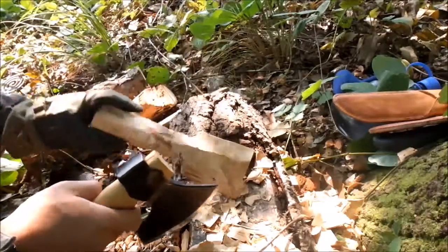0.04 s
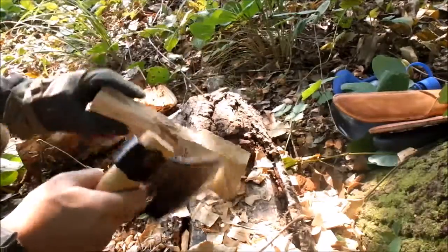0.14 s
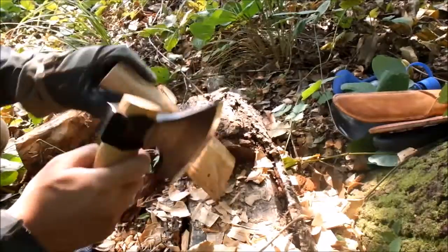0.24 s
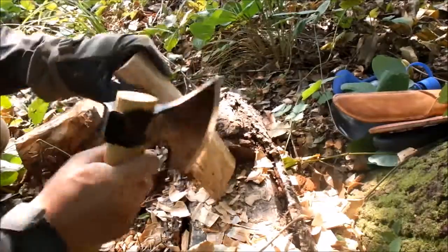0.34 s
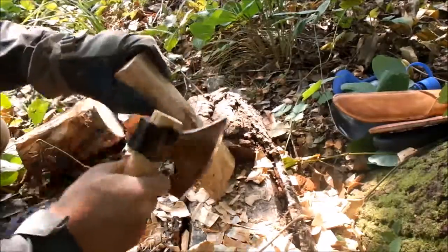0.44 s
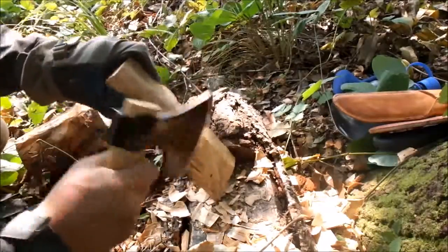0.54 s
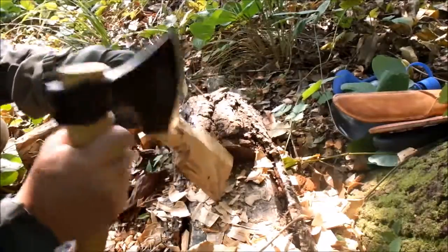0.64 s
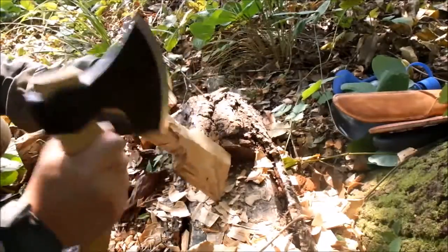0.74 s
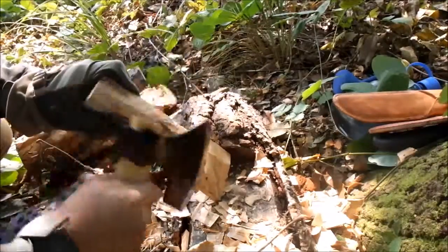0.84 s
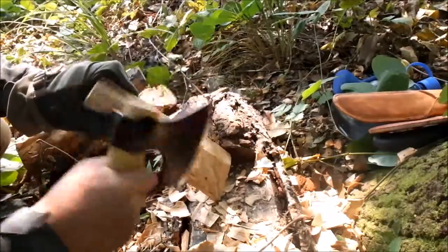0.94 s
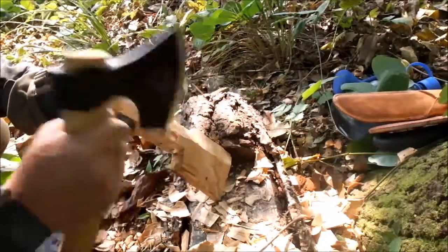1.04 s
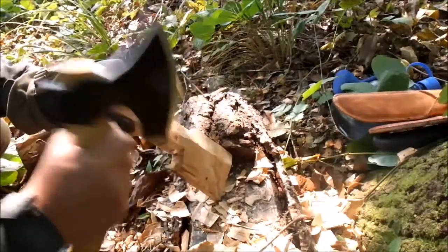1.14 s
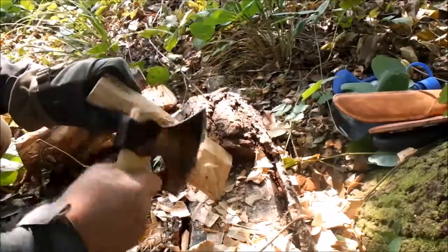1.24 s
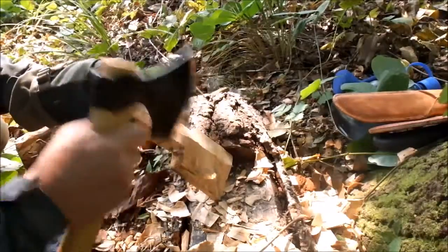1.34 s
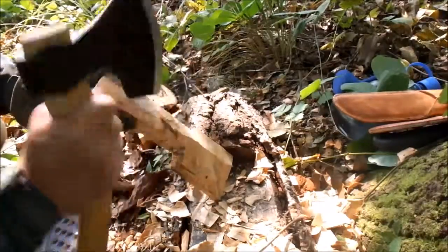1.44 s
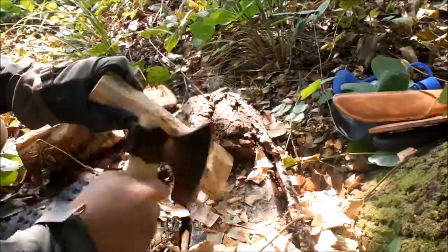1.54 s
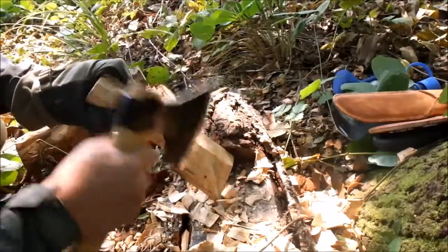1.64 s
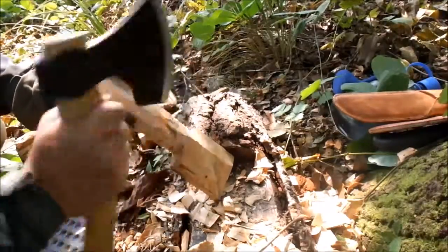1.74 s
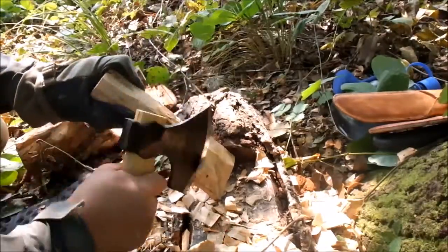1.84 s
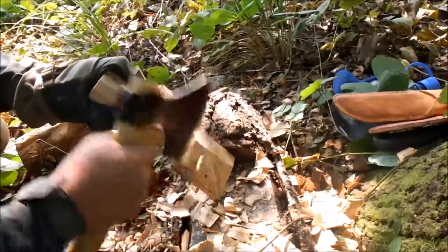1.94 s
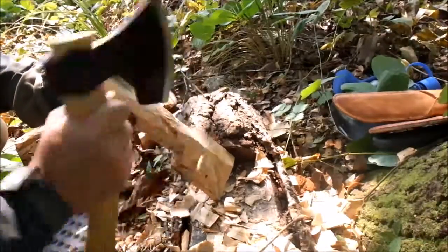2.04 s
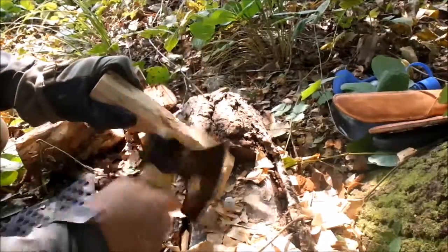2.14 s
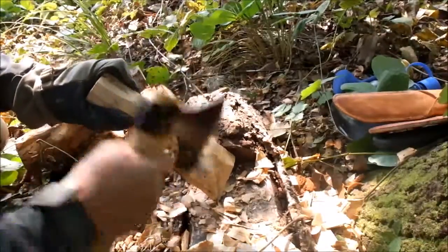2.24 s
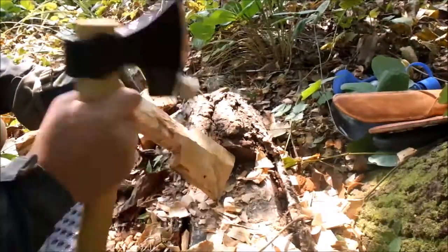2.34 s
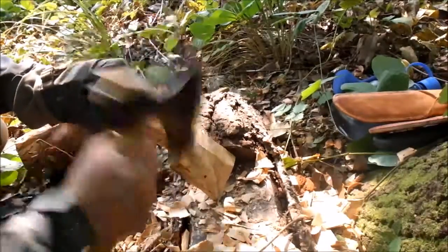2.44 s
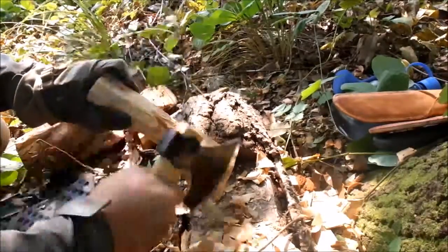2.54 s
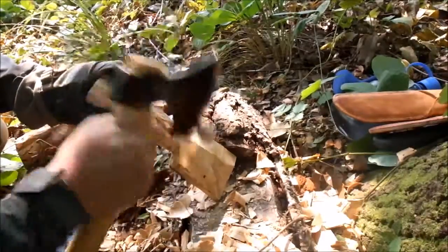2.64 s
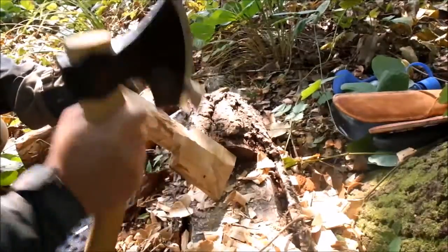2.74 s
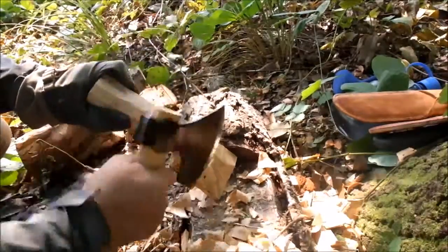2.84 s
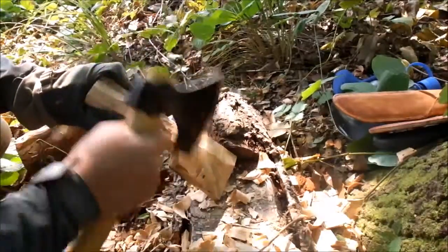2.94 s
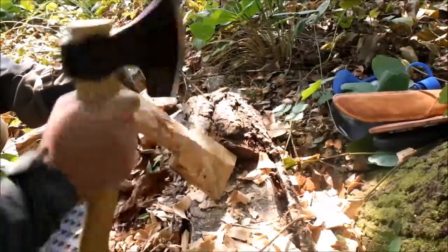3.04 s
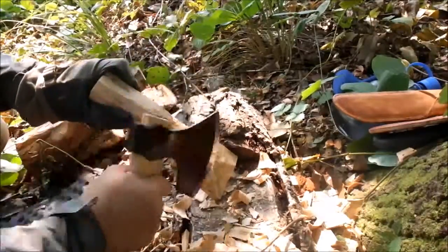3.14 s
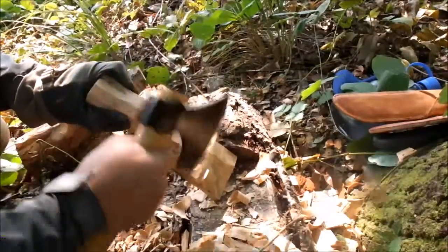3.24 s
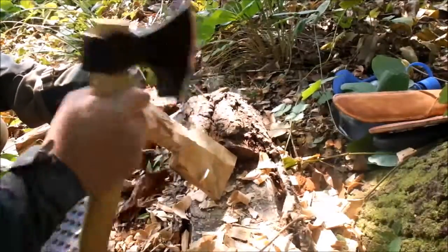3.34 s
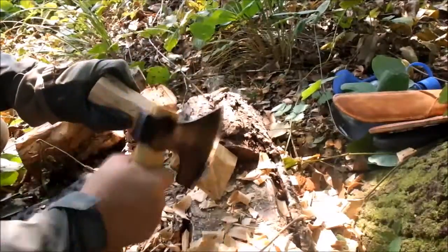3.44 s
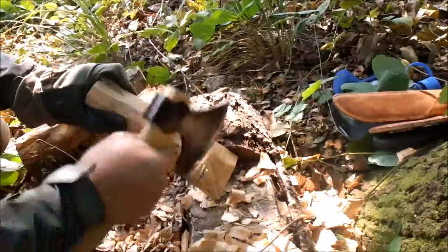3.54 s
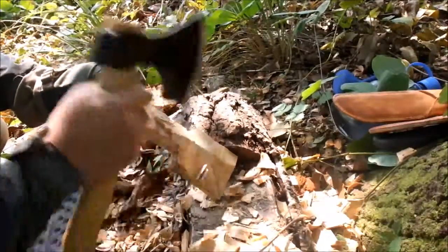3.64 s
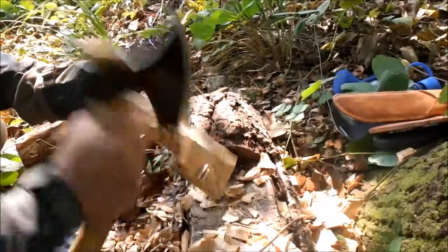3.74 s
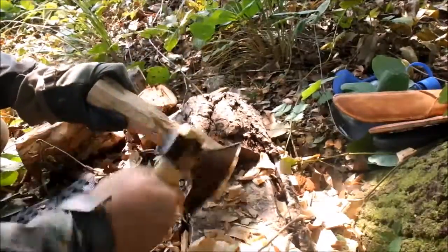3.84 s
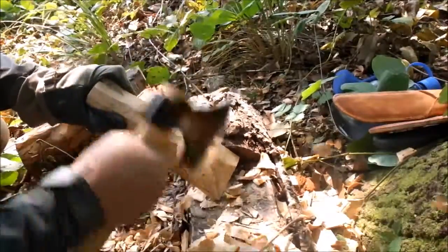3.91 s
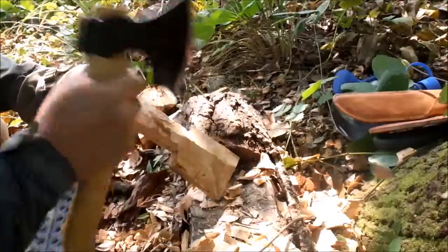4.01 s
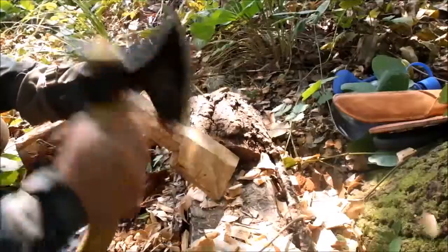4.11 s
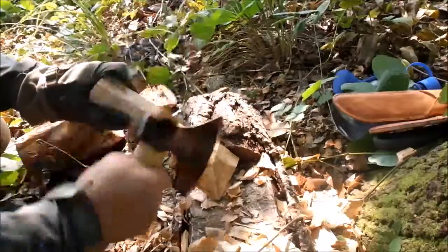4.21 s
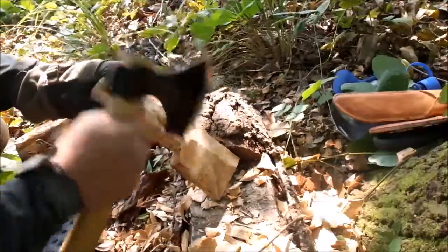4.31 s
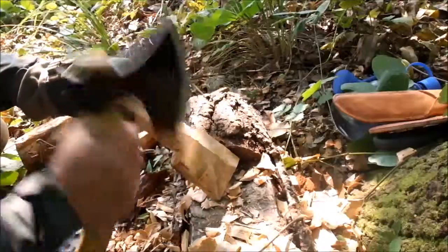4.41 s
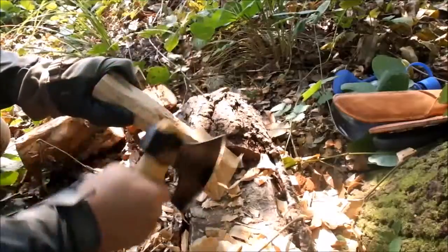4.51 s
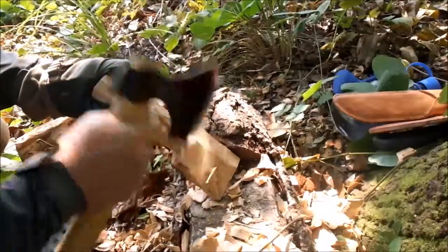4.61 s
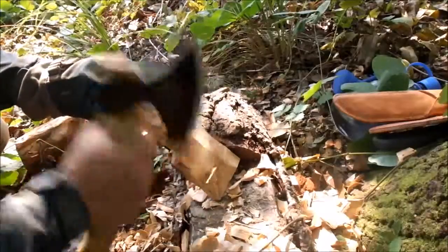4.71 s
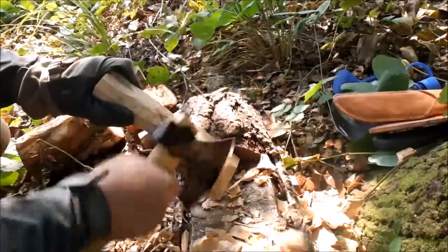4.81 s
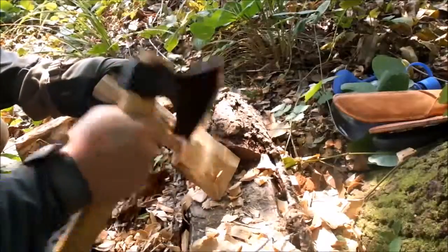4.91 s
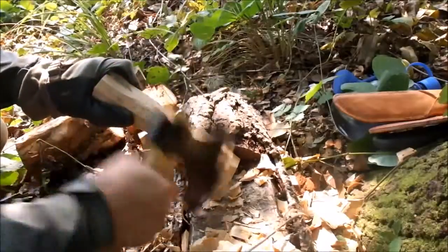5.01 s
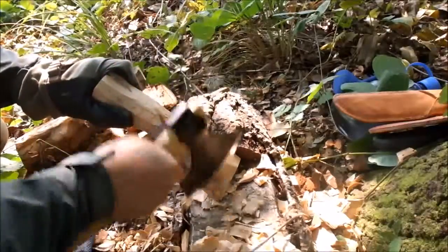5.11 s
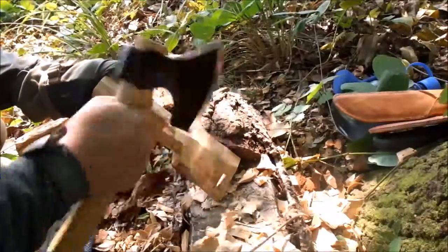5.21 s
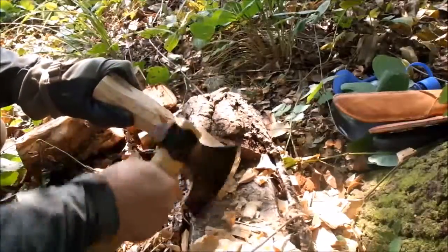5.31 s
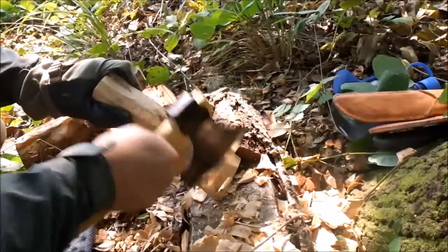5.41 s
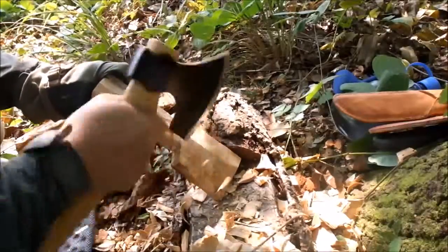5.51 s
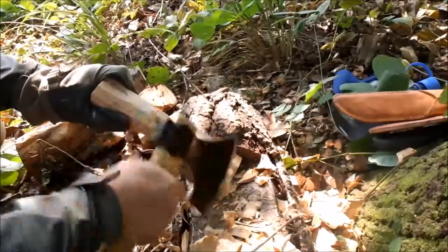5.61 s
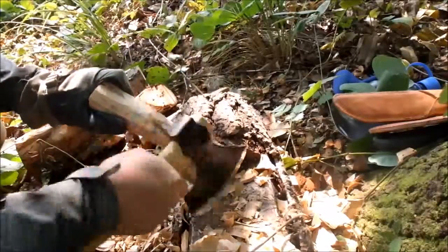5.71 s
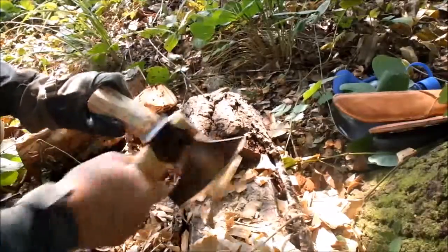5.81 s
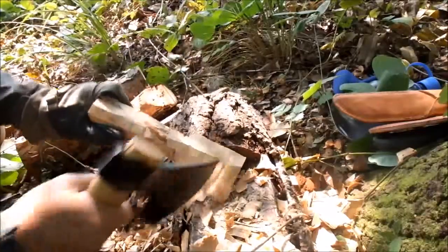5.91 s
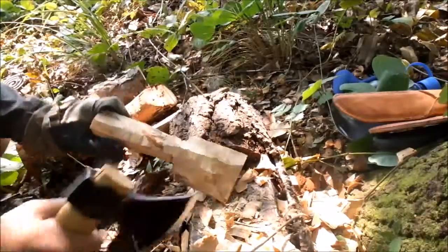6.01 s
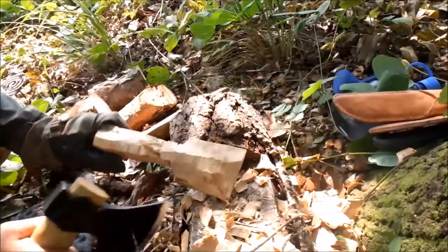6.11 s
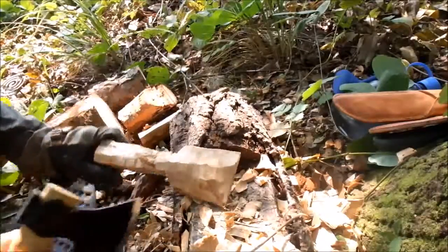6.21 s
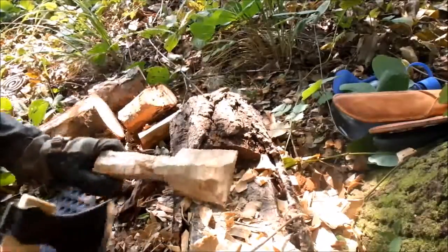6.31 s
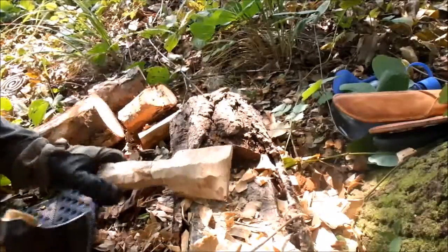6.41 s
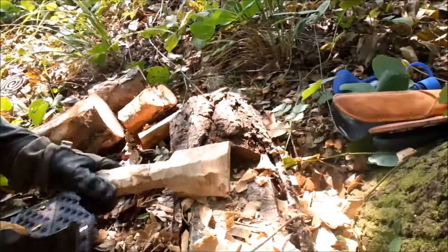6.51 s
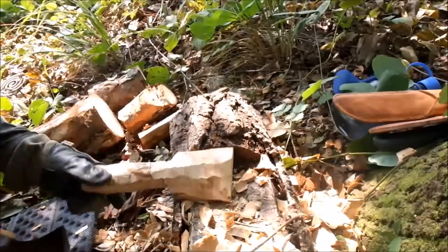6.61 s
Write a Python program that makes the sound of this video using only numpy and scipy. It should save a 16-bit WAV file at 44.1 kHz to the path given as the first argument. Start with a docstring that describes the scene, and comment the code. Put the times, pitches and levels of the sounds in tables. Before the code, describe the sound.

Quick, close hatchet blows crack and tear wood about three times a second in a forest, while shrill insects shimmer and a cicada buzzes early.

```python
"""In a forest, a small hatchet chops about three times a second into a wooden blank held on a log.
Each blow rings damped modes of blank and log, fibres tear in dense random breaks, and chips tick in the leaves.
Ground litter and trees return scattered echoes. Air noise, lower during the chopping, and a lumpy draught are
shaped noise. A pulsing insect chorus is coloured noise with narrow bands; a nearer cicada is a click train
ringing a shell. The recorder's limiter ducks under the hard blows."""
import sys
import numpy as np
from scipy import signal
from scipy.fft import rfft, irfft
from scipy.io import wavfile
from scipy.ndimage import uniform_filter1d, minimum_filter1d

SR = 44100
rng = np.random.default_rng(int(sys.argv[2]) if len(sys.argv) > 2 else 0)


def bounce(signal):
    """Save signal as a 16-bit WAV file at the path given by the first command-line argument."""
    frames = np.transpose(np.atleast_2d(signal))
    limited = np.clip(frames, -1, 1)
    pcm = np.round(limited * 32767).astype(np.int16)
    wavfile.write(sys.argv[1], SR, pcm)


N = 293706
TIME = np.arange(N) / SR
SHORT = TIME[:4096]   # time axis of one burst


def from_db(db):
    """Decibels to amplitude ratio: 20 dB is a factor of ten."""
    return 10 ** (np.asarray(db) / 20)


def rms_one(x):
    """Normalisation by mean power: the result has rms 1."""
    return x / np.sqrt(np.mean(x ** 2) + 1e-20)


def over(x, seconds):
    """Normalisation by energy: the burst carries as much as rms 1 held for the given time."""
    return x / np.sqrt(np.sum(x ** 2) / (seconds * SR) + 1e-20)


def in_time(rows):
    """Linear interpolation of a curve's columns at every sample."""
    s, *columns = np.transpose(rows)
    return [np.interp(TIME, s, c) for c in columns]


def cut(x, hz, kind, order=2):
    """Causal Butterworth filtering."""
    hz = np.clip(hz, 10, .47 * SR)
    return signal.sosfilt(signal.butter(order, hz, kind, fs=SR, output="sos"), x)


def pan(x, left_db):
    """Placement by interchannel level difference, left over right."""
    return x * from_db(np.array([[left_db], [-left_db]]) / 2)


def place(x, left_db, lag_ms):
    """Placement of a close source by level difference and a later arrival on the right."""
    left, right = pan(x, left_db)
    return np.array([left, np.interp(SHORT - lag_ms / 1000, SHORT, right, left=0)])


def add(track, s, sound):
    """Superposition: a short sound is summed in at time s."""
    i = int(s * SR)
    track[:, i:i + sound.shape[-1]] += sound[..., :N - i]


def drift(rate):
    """Slow random modulation: chance values, rate per second, joined by lines; rms 1."""
    knots = rng.standard_normal(int(rate * N / SR) + 2)
    return rms_one(np.interp(TIME * rate, np.arange(len(knots)), knots))


def noise(spectrum, alike):
    """Spectral shaping of white noise, with mid and side mixed for left-right likeness; rms 1."""
    hz, db = np.transpose(spectrum)
    f = np.maximum(np.fft.rfftfreq(N, 1 / SR), 1)
    octaves_beyond = np.abs(np.log2(f / np.clip(f, hz[0], hz[-1])))
    colour_db = np.interp(np.log(f), np.log(hz), db) - 20 * octaves_beyond
    mid, side = irfft(rfft(rng.standard_normal((2, N))) * from_db(colour_db), N)
    alike = np.clip(alike, -1, 1)
    return rms_one(np.sqrt(1 + alike) * mid + np.sqrt(1 - alike) * side * [[1], [-1]])


def ring(modes, pitch, scatter_db, detune):
    """Modal synthesis of one strike: damped sines in alternating sense, their strength and pitch varied."""
    hz, db, t60 = np.transpose(modes)[:, :, None]
    strength, shift = rng.standard_normal((2, len(modes), 1))
    decay = from_db(db + scatter_db * strength - 60 * SHORT / t60)
    each = decay * np.sin(2 * np.pi * hz * pitch * np.exp(detune * shift) * SHORT)
    return each[::2].sum(axis=0) - each[1::2].sum(axis=0)


def grains(per_s, spread_db):
    """Poisson-like fracture: random tiny breaks of uneven size over a faint hiss."""
    chance, size = rng.random(len(SHORT)), rng.standard_normal(len(SHORT))
    breaks = (chance < per_s / SR) * np.sign(size) * from_db(spread_db * np.abs(size))
    return breaks + 0.089 * rng.standard_normal(len(SHORT))


# Level of the air noise, lower during the chopping.
# Each row: time in seconds, level in dB before a 5.5 dB lift.
AIR_LEVEL = [(0, -57.8), (.3, -57.6), (.7, -55.4), (1.0, -61), (4.2, -62.4), (5.7, -61.6), (6.25, -56.3),
             (6.66, -57.5)]
# Colour of the air noise. Each row: frequency in Hz, relative density in dB per Hz.
AIR_COLOUR = [(170, -1.5), (350, -7), (560, -2), (940, 3), (1150, -2), (1500, -1.5), (2200, -6),
              (3500, -10.5), (6000, -9)]
# Colour of the draught. Each row: frequency in Hz, relative density in dB per Hz.
DRAUGHT_COLOUR = [(20, -9.5), (45, -2), (80, 1), (140, 0), (250, -10), (500, -24)]
# Gusts of the draught on the microphone. Each row: time of the crest in seconds, rise in dB.
GUSTS = [(1.0, 8), (4.02, 6), (5.56, 8)]
DRAUGHT_DB, GUST_S = -61.7, .13   # level between gusts; half length of a gust


def background():
    """Broad-band noise by filtering: air noise, and a lumpy draught raised by gusts."""
    air_db, = in_time(AIR_LEVEL)
    gust_db = sum(db * np.exp(-((TIME - s) / GUST_S) ** 2) for s, db in GUSTS)
    air = pan(noise(AIR_COLOUR, 0.62), 3.0) * from_db(air_db + 5.5 + 0.2 * drift(17))
    draught_db = DRAUGHT_DB + gust_db + 2.9 * drift(14)
    draught = pan(noise(DRAUGHT_COLOUR, 0.59), 4.5) * from_db(draught_db)
    return air + draught


def trill(hz, width_hz):
    """Narrow-band noise: a far, rough whistle, independent on each side; rms 1."""
    band = [hz - width_hz / 2, hz + width_hz / 2]
    return rms_one(cut(rng.standard_normal((2, N)), band, "band"))


# Colour of the far insect chorus. Each row: frequency in Hz, relative density in dB per Hz.
CHORUS_COLOUR = [(3500, -24), (5500, -20), (6500, -11), (7100, 0), (7700, 0.5), (8700, 0), (9600, -4.5),
                 (10200, -8), (10900, -10), (13000, -18), (15000, -15), (16000, -19)]
# Level at which the chorus is heard, dipping at times during the cicada's song and the chopping.
# Each row: time in seconds, level in dB before a 1.5 dB lift.
CHORUS_LEVEL = [(0, -44.5), (1.2, -43.7), (1.8, -46.8), (2.8, -43.8), (4.1, -47), (5.6, -48.5),
                (6.6, -45.3)]
# Insects that stand out. Each row: frequency in Hz, bandwidth in Hz, mean level in dB against the chorus.
SINGERS = [(7774, 170, -8), (8395, 260, -8), (9320, 490, -13.5)]
# Faint high chirps far away. Each row: time of the crest in seconds, level in dB.
CHIRPS = [(.11, -60), (.32, -57), (1.09, -55), (5.66, -60), (6.44, -53.5)]
PULSE_S, PULSE_TOP_S, PULSE_DB = .3275, .126, 2   # period, time of one crest, swing either way


def insects():
    """Amplitude modulation: a chorus pulsing in step, singers that throb on their own, and lower chirps."""
    pulse_db = PULSE_DB * np.cos(2 * np.pi * (TIME - PULSE_TOP_S) / PULSE_S)
    chorus_db = in_time(CHORUS_LEVEL)[0] + pulse_db + 1.5 + 1.4 * drift(28)
    chorus = noise(CHORUS_COLOUR, -0.34)
    for hz, width_hz, db in SINGERS:
        throb_db = 2 * drift(4) + 2 * drift(75)
        chorus = chorus + trill(hz, width_hz) * from_db(db + throb_db)
    chirps = sum(from_db(db) * np.exp(-((TIME - s) / 0.057) ** 2) for s, db in CHIRPS)
    return pan(rms_one(chorus), 3.7) * from_db(chorus_db) + chirps * trill(4660, 350)


# Hatchet strokes; the blank's pitch shifts with the grip, and a keen, slicing stroke is brighter than a blunt one.
# Each row: start in seconds, strength in dB, pitch of the blank in Hz, keenness in dB,
# time until the chip parts in seconds, level of the tearing in dB.
STROKES = [ (.9103, -25.5, 1520, -2, .011, -26.5), (1.2926, -17, 1420, -3, .017, -30),
           (1.621, -14.5, 1420, -3, .021, -31.5), (1.933, -14.5, 1460, -6, .011, -32),
           (2.2223, -8.5, 1520, -8.5, .020, -28.5), (2.5717, -29.5, 1680, 4.5, .025, -29),
           (2.9159, -28.5, 1860, 4, .009, -29), (3.227, -14.5, 1580, 0, .017, -33),
           (3.5566, -11, 1555, -1.5, .010, -40), (3.882, -7.5, 1565, -6, .034, -29.5),
           (4.256, -11.5, 1497, -3.5, .008, -28), (4.564, -11, 1590, 2.5, .011, -23),
           (4.859, -8, 1770, -3.5, .008, -24), (5.1318, -10, 1866, -2, .015, -34.5),
           (5.4043, -8, 1865, -3, .014, -25.5), (5.7105, -13.5, 1810, -10, .018, -33)]
# The blank bumps on the log or against the blade between strokes.
# Each row: start in seconds, thud in dB, hardness in dB.
BUMPS = [(.3686, -39, -10), (.549, -28.5, -13), (2.266, -25, -11.5), (2.5958, -23, -3.5), (2.9771, -49, 11),
         (3.4686, -55, 12), (3.901, -26, 2), (5.4173, -26, -16), (5.745, -38, 0)]
# Log's thud under a stroke of zero keenness, as the blank rests less firmly.
# Each row: time in seconds, level in dB.
SEATING = [(.9, -21), (1.3, -23.5), (2.8, -27.5), (5.7, -28)]
THUD_PER_KEEN = -.3   # dB per dB: a blunt stroke drives more into the log
# Blank's reference bending modes; share of the upper one's shift that the lower follows.
LOWER_MODE_HZ, UPPER_MODE_HZ, LOWER_FOLLOWS = 1150, 1620, .25
BITE_HZ, BITE_OCTAVES_PER_DB = 3250, .028   # the bite rises in pitch with keenness or hardness
SNAP_DB, SNAP_PER_KEEN = -29.5, 1.35   # level at zero keenness; dB per dB
BUMP_PITCH_HZ = 1480
BUMP_BITE_DB, BUMP_SNAP_DB = -2, -5   # against the bump's knock, before the hardness term below
BUMP_BRIGHTENS = .25   # extra treble in dB per dB of hardness


def pitches(blank_hz, keen_db):
    """Modal shift: lower and upper mode of the blank and pitch of the bite, all in Hz."""
    lower_hz = LOWER_MODE_HZ * (blank_hz / UPPER_MODE_HZ) ** LOWER_FOLLOWS
    return lower_hz, blank_hz, BITE_HZ * 2 ** (BITE_OCTAVES_PER_DB * keen_db)


def contacts():
    """Impact excitation: (s, lower mode Hz, upper mode Hz, bite Hz, thud dB, knock dB, bite dB, snap dB)."""
    for s, knock_db, hz, keen_db, _, _ in STROKES:
        thud_db = np.interp(s, *np.transpose(SEATING)) + THUD_PER_KEEN * keen_db
        snap_db = SNAP_DB + SNAP_PER_KEEN * keen_db
        yield s, *pitches(hz, keen_db), thud_db, knock_db, knock_db + keen_db, snap_db
    for s, thud_db, hard_db in BUMPS:
        knock_db = thud_db + hard_db
        treble_db = knock_db + BUMP_BRIGHTENS * hard_db
        bite_db, snap_db = treble_db + BUMP_BITE_DB, treble_db + BUMP_SNAP_DB
        yield s, *pitches(BUMP_PITCH_HZ, hard_db), thud_db, knock_db, bite_db, snap_db


def ground_thump():
    """Transmission into soft soil: the log passes on the blow as a low, damped sine."""
    hz = rng.uniform(50, 100)
    return cut(np.sin(2 * np.pi * hz * SHORT) * from_db(-60 * SHORT / 0.16), 92, "low")


# Modes of the log. Each row: frequency in Hz at the reference pitch of the blank, relative level in dB,
# 60 dB decay time in seconds.
LOG_MODES = [(265, -3, .017), (410, 0, .015), (640, -4, .012), (860, -3, .011)]
# Modes set off as the blade bites. Each row: multiple of the bite's pitch, relative level in dB,
# 60 dB decay time in seconds.
BITE_MODES = [(.72, -1, .005), (1.09, 0, .0055), (1.42, -4, .003), (1.8, -7, .003)]
LOG_PITCH_AT_HZ, LOG_FOLLOWS = 1520, .5   # reference pitch of the blank; exponent by which the log follows
CONTACT_S = .01   # time over which a burst's level is reckoned


def chops():
    """Modal response to impact: thud of the log, knock of the blank, bite of the edge and a bright snap."""
    out = np.zeros((2, N))
    for s, lower_hz, upper_hz, bite_hz, thud_db, knock_db, bite_db, snap_db in contacts():
        log_pitch = (upper_hz / LOG_PITCH_AT_HZ) ** LOG_FOLLOWS
        thud = ring(LOG_MODES, log_pitch, scatter_db=1.5, detune=.06)
        thud = cut(cut(thud, 300, "high", order=1), 1300, "low")
        blank_modes = [(lower_hz, -3, .011), (upper_hz, 0, .009)]   # Hz, dB, 60 dB decay in s
        knock = cut(ring(blank_modes, 1, scatter_db=.7, detune=.01), 600, "high")
        bite = ring(BITE_MODES, bite_hz, scatter_db=1.5, detune=.025)
        bite = cut(cut(bite, 1800, "high"), 6500, "low", order=6)
        snap = cut(grains(9000, 3.5) * from_db(-60 * SHORT / .007), [5500, 11500], "band")
        thump_db = max(thud_db + 5.5, knock_db - 4) - 25
        add(out, s, place(over(thud, CONTACT_S) * from_db(thud_db), 4.5, lag_ms=.06))
        add(out, s, place(over(knock, CONTACT_S) * from_db(knock_db), 2, lag_ms=.035))
        add(out, s, place(over(bite, CONTACT_S) * from_db(bite_db), -.2, lag_ms=.015))
        add(out, s, pan(over(snap, CONTACT_S) * from_db(snap_db), 2))
        add(out, s, pan(ground_thump() * from_db(thump_db), 6.1))
    return out


TEAR_STARTS, CRACKLE_DB = .42, -2.5   # share of the time until the chip parts; crackle against the woody part
BUMP_CRUNCH_DB, BUMP_CRUNCH_S = -4.5, .009   # against the bump's knock; length


def splits():
    """Delayed fracture: tears after a stroke and crunches under a bump, as (s, length s, dB)."""
    for s, _, _, _, parts_s, db in STROKES:
        yield s + TEAR_STARTS * parts_s, (1 - TEAR_STARTS) * parts_s, db
    for s, thud_db, hard_db in BUMPS:
        yield s, BUMP_CRUNCH_S, thud_db + hard_db + BUMP_CRUNCH_DB


def tearing():
    """Fracture noise: a dense run of fibre breaks shakes the blank and the log under it."""
    out = np.zeros((2, N))
    for s, length, woody_db in splits():
        length = max(length, .003)
        fade = from_db(-60 * np.maximum(SHORT - 0.82 * length, 0) / 0.033)
        breaks = grains(4000, 5.5) * np.minimum(SHORT / 0.00052, 1) * fade
        woody = over(cut(breaks, [800, 1900], "band"), length)
        shake = over(cut(breaks, [170, 520], "band"), length) * from_db(-8.5)
        crackle = cut(cut(breaks, [2600, 4600], "band", order=1), 1600, "high")
        crackle = over(crackle, length) * from_db(woody_db + CRACKLE_DB)
        add(out, s, pan((woody + shake) * from_db(woody_db), 5.9) + crackle)
    return out


def scatter(x, response, level_db):
    """Convolution: the source, summed to mono, through an echo response of unit mean energy."""
    response = response / np.sqrt(np.sum(response ** 2) / 2)
    return from_db(level_db) * signal.fftconvolve(x.mean(axis=0)[None], response, axes=1)[:, :N]


def litter(x):
    """Early scattering: log, chips and leaves close by throw back a quick, ragged echo."""
    t = TIME[:SR // 12]
    colour = [(200, 2.5), (1000, -6.5), (3000, -5.5), (7000, -0.5), (14000, -14)]   # Hz, dB per Hz
    response = noise(colour, 0.29)[:, :len(t)] * (t > .002) * from_db(-60 * t / 0.04)
    return scatter(x, response, -16.5)


# Colour of sound scattered by trunks and leaves. Each row: frequency in Hz, relative level in dB.
FOREST_COLOUR = [(150, -2), (500, -2), (1000, 0), (1400, -4), (1900, 1), (2600, -2), (3600, 1), (4800, -7),
                 (6500, -5), (12000, -8)]


def forest(x):
    """Diffuse reverberation: trunks and leaves scatter a thin wash that builds over some tens of milliseconds."""
    t = TIME[:SR // 2]
    fade = np.minimum(t / .03, 1) * from_db(-60 * t / .38)
    return scatter(x, noise(FOREST_COLOUR, 0.72)[:, :len(t)] * fade, -32)


# Near cicada: it swells, holds and dies away; its tymbal slows and steadies as the song settles.
SONG_FULL_S, SONG_ENDS_S, SONG_DB = 1.21, 2.42, -40.5   # end of the swell, start of the fall, held level
SONG_RISE_DB_PER_S, SONG_FALL_DB_PER_S = 55, 32
TYMBAL_START_HZ, TYMBAL_HELD_HZ = 600, 570.4
SETTLE_AT_S, SETTLE_S = 1.42, .11
UNEVEN_START, UNEVEN_HELD = .65, .22   # difference between alternate clicks, 0-1
JITTER_HELD, JITTER_LOOSE = .0012, .014   # share of the click rate


def song():
    """Control curves at every sample: the cicada's clicks per s, level in dB, unevenness and jitter."""
    rising_db = SONG_RISE_DB_PER_S * np.minimum(TIME - SONG_FULL_S, 0)
    falling_db = SONG_FALL_DB_PER_S * np.minimum(SONG_ENDS_S - TIME, 0)
    fresh = (1 - np.tanh((TIME - SETTLE_AT_S) / (2 * SETTLE_S))) / 2   # 1 at the start, 0 once settled
    per_s = TYMBAL_HELD_HZ + (TYMBAL_START_HZ - TYMBAL_HELD_HZ) * fresh
    uneven = UNEVEN_HELD + (UNEVEN_START - UNEVEN_HELD) * fresh
    jitter = JITTER_HELD + JITTER_LOOSE * (fresh ** 2 + 1 - from_db(falling_db))
    return per_s, SONG_DB + rising_db + falling_db, uneven, jitter


def cicada():
    """Resonance and multipath: strong and weak tymbal clicks ring a small shell; foliage smears them."""
    per_s, level_db, uneven, unsteady = song()
    cycle = np.cumsum(per_s * (1 + unsteady * drift(60))) / SR   # the beat is rough as the song starts and ends
    phase = cycle % 1
    clicks = np.exp(-phase / .22) * (1 + uneven * (-1) ** np.floor(cycle))
    shell = clicks * np.sin(2 * np.pi * 8260 * phase / per_s) * (1 + .2 * drift(500))
    shell = cut(cut(shell, 6800, "high", order=10), 11500, "low")
    heard = np.array([shell, np.roll(shell, 1)])   # right side one sample later
    for delays in rng.uniform(0.00084, .006, (6, 2)):   # paths over swaying leaves make each partial waver
        heard = heard + [.35 * drift(6) * np.roll(shell, int(d * SR)) for d in delays]
    return pan(rms_one(heard) * from_db(level_db), 3.5)


# Chips landing on dry leaves. Each row: start in seconds, peak in dB.
CHIPS = [(1.063, -31), (2.3072, -34.5), (2.4269, -36.5), (2.8589, -36.5), (4.0153, -44), (4.7596, -32.5),
         (5.0589, -33.5), (5.654, -48)]


def chips():
    """Granular impact: light chips tick and skitter in the leaf litter as decaying random grains."""
    out = np.zeros((2, N))
    for s, peak_db in CHIPS:
        tick = cut(grains(1800, 4.2) * from_db(-60 * SHORT / .045), [2300, 5200], "band")
        add(out, s, tick / np.abs(tick).max() * from_db(peak_db))
    return out


def scene():
    """Superposition: woodwork with its echoes, insects, air noise and draught."""
    wood = chops() + tearing() + chips()
    return background() + insects() + wood + litter(wood) + forest(wood) + cicada()


def limiter(x, ceiling_db, release_db_per_s):
    """Peak limiting: the gain drops just ahead of a peak and comes back quickly."""
    excess = np.maximum(20 * np.log10(np.abs(x).max(axis=0) + 1e-9) - ceiling_db, 0)
    release = release_db_per_s * TIME
    held = np.maximum.accumulate(excess + release) - release
    return x * from_db(uniform_filter1d(minimum_filter1d(-held, size=41), size=41))


CUTOFF_HZ = 15850


def record(dry):
    """Limiting, saturation and low-pass filtering: peaks are held and rounded, and the top is cut."""
    limited = limiter(dry * from_db(1), ceiling_db=4, release_db_per_s=110)
    rounded = limited / (1 + (limited / .97) ** 6) ** (1 / 6)
    return signal.sosfilt(signal.ellip(12, .1, 100, CUTOFF_HZ, fs=SR, output="sos"), rounded)


dry = scene()
out = record(dry)
bounce(out)
```